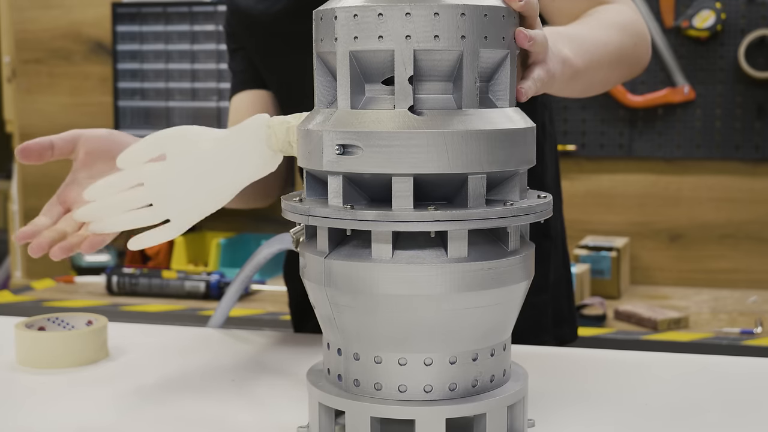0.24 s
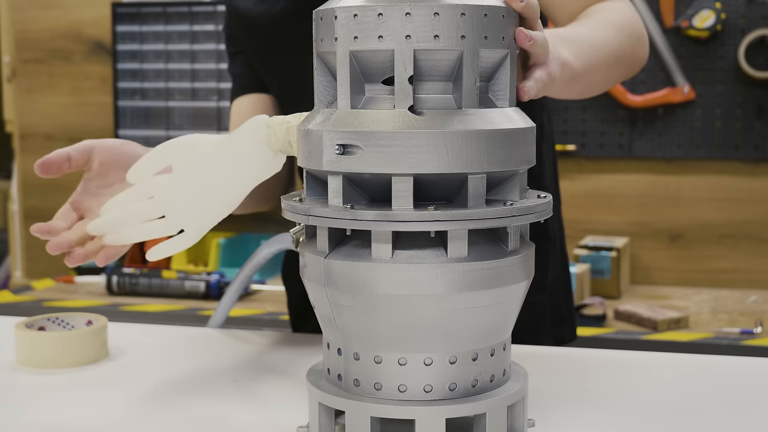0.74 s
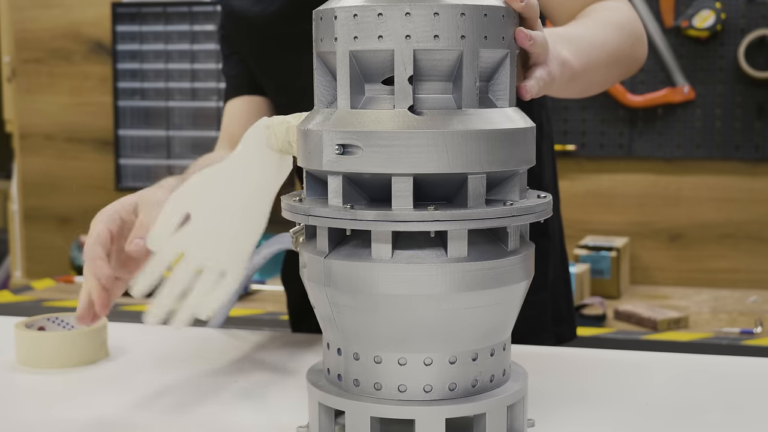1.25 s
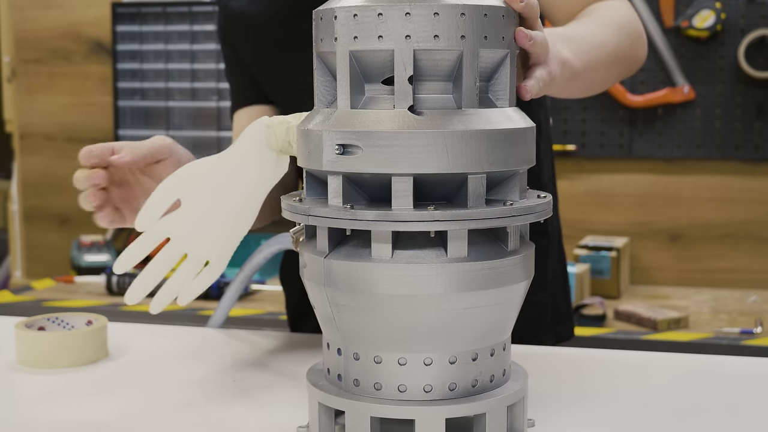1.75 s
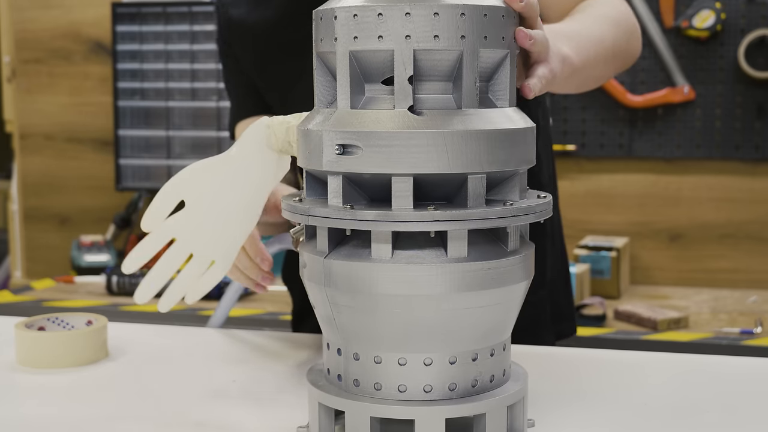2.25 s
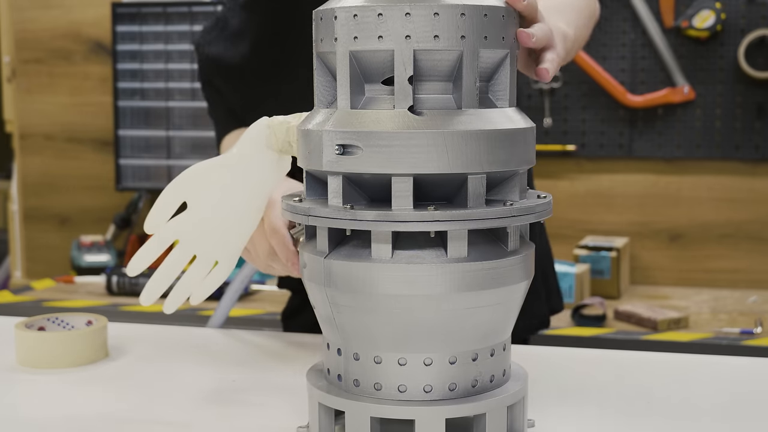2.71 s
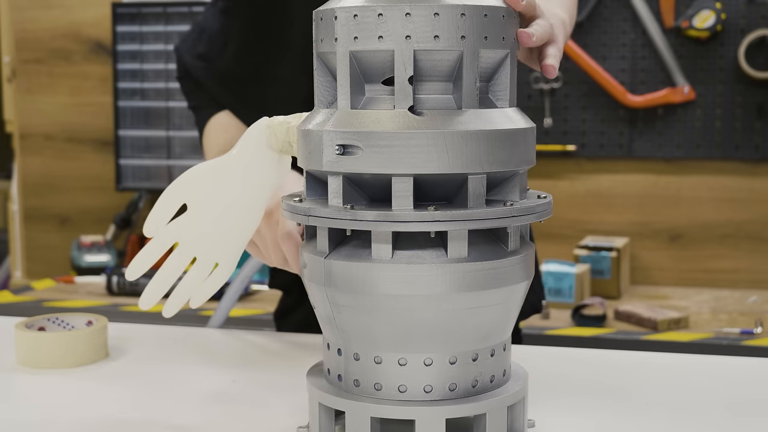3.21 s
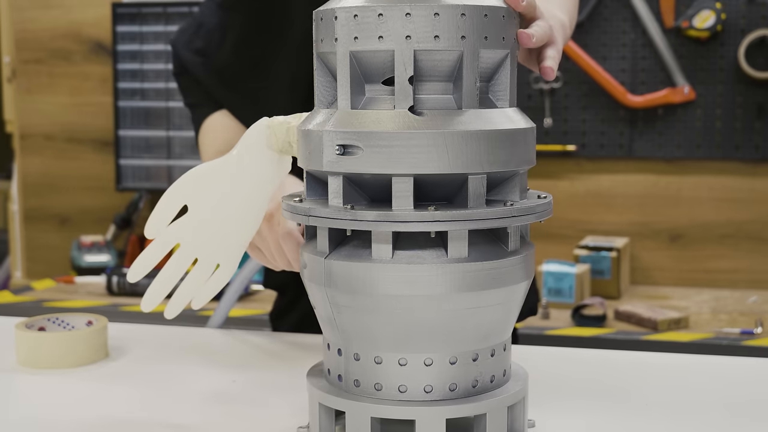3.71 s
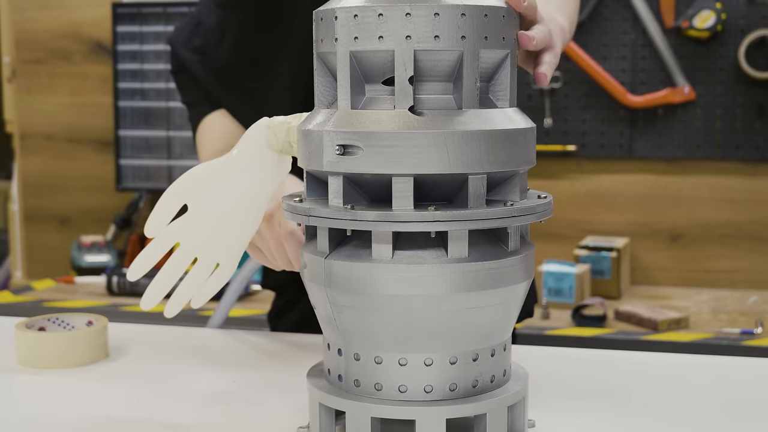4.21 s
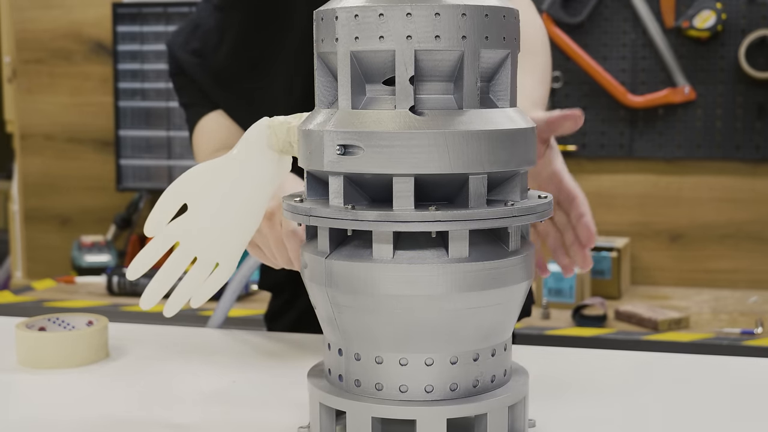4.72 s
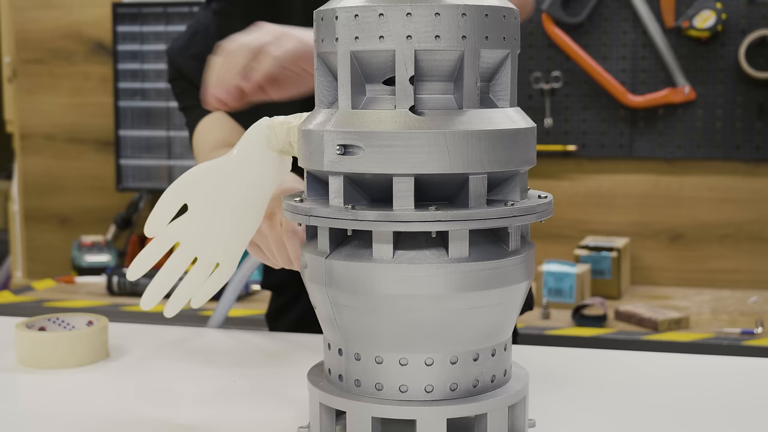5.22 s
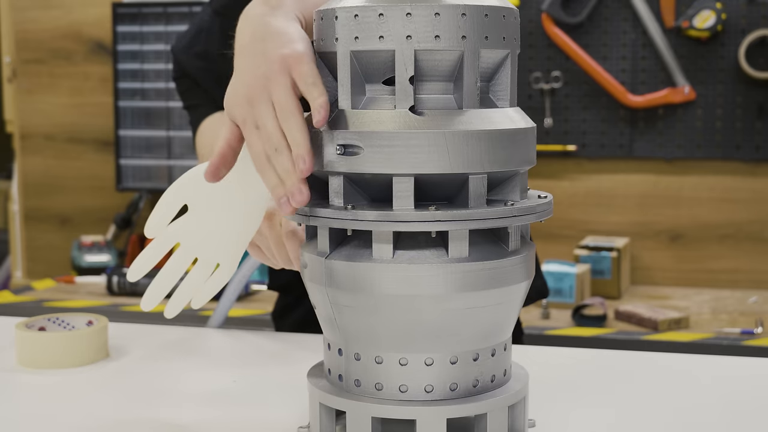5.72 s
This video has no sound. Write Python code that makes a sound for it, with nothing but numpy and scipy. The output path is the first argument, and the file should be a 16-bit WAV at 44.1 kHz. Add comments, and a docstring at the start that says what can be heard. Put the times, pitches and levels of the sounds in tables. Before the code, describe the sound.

Compressed air hisses through a small spinning turbine while a wavering whistle swells above its rush and low hum.

```python
"""On a workbench, compressed air drives a small turbine that spins the impellers of a plastic compressor.
The bench drones; the rotor hums and its blades sing faintly as it speeds up and sags. Turbulence roars
in the housing, and the exhaust jet hisses through narrow resonant ducts. The main sound is a wavering
whistle, made as the flow locks onto the resonance of one cavity in the housing.
The gain control of a close microphone ducks the rest under the whistle."""
import sys
import numpy as np
from scipy import signal
from scipy.fft import rfft, irfft
from scipy.io import wavfile
from scipy.ndimage import uniform_filter1d, minimum_filter1d

SR = 44100
rng = np.random.default_rng(int(sys.argv[2]) if len(sys.argv) > 2 else 0)


def file_out(sig):
    """Save sig as 16-bit WAV at sys.argv[1]."""
    # one column per channel
    cols = np.atleast_2d(sig).T
    # limit, then scale
    lim = np.clip(cols, -1, 1)
    pcm = np.round(lim * 32767).astype(np.int16)
    wavfile.write(sys.argv[1], SR, pcm)


N = 262615

# air supply, eased once the rotor is up to speed: t/s, flow level/dB
AIR_FLOW = [(0, 1.5), (.9, 1), (1.4, -1.5), (1.95, -1), (3.5, -1.5), (4.7, -2.5), (5.95, -3.5)]
# rotation rate of the shaft: t/s, f/Hz
SHAFT_SPEED = [(0, 48.88), (1.2, 55.92), (1.85, 57.23), (2.35, 55.8), (3.0, 50.8), (3.55, 48.97),
               (4.0, 50.35), (4.9, 51.3), (5.95, 50.05)]
# low drone of bench and workshop: f/Hz, relative spectral level/dB
DRONE_SPECTRUM = [(20, -45), (32, -26), (38, -3), (44, 0), (52, 7), (62, -17), (80, -8), (130, -37),
                  (400, -60)]
# turbulence in the housing: f/Hz, relative spectral level/dB
CHAMBER_SPECTRUM = [(60, -46), (125, -41), (200, -62), (300, -25), (370, -24), (410, -19.5), (520, -1.5),
                    (640, 1), (760, 3.5), (840, -2), (970, -7), (1080, -18), (1300, -26), (2000, -67)]
# wider roar of a strong jet: f/Hz, relative spectral level/dB
WIDE_ROAR_SPECTRUM = [(50, -13), (100, -15), (300, -6.5), (600, -3.5), (820, 5), (1020, 3), (1200, -5),
                      (1700, -29)]
# jet noise before the ducts colour it: f/Hz, relative spectral level/dB
JET_SPECTRUM = [(100, -42.5), (500, 5.5), (1200, -2.5), (2000, -2.75), (4000, 0), (7000, -3), (10000, -4),
                (15600, -5.5)]
# resonances of the exhaust ducts and vane passages: f/Hz, width/Hz, peak gain/dB
DUCT_MODES = [(1590, 440, 3.5), (2205, 190, 6.0), (2380, 300, 4.7), (2980, 630, 5.9), (3560, 230, 5.9),
              (4180, 430, 6.8), (4740, 330, 10.6), (5070, 330, 10.2), (5530, 560, 7.3), (6350, 900, 6.3),
              (7600, 330, 5.0), (8280, 480, 2.6), (9400, 520, 5.6), (10430, 610, 3.1), (11260, 900, 5.4),
              (12770, 900, 8.3), (13740, 480, 6.1), (14730, 450, 8.2), (15470, 610, 4.0)]
# course of the cavity whistle: t/s, f/Hz, level/dB
WHISTLE_COURSE = [(0, 744, -56), (.7, 741.4, -39), (1.15, 737, -22), (1.4, 739.1, -13), (1.7, 721, -12),
                  (2.1, 717, -8.5), (3.2, 713.7, -10.5), (4.3, 717.3, -12.5), (5.15, 725.4, -15),
                  (5.55, 743.6, -21.5), (5.95, 737, -22)]
# the whistle briefly loses its lock on the cavity: t/s, dip in level/dB
LOCK_LOSSES = [(1.39, 6.5), (3.9, 1.5), (4.75, 6.5), (4.93, 6), (5.58, 4)]

FULL_SPEED_HZ = 57.46


def undb(db):
    """Amplitude ratio of a level in decibels."""
    return 10 ** (np.asarray(db) / 20)


def curves(table):
    """Linear interpolation in time: each column after the first as a value per sample."""
    times, *columns = np.transpose(table)
    return [np.interp(np.arange(N) / SR, times, column) for column in columns]


def bins():
    """Frequencies of the Fourier bins, at least 1 Hz."""
    return np.maximum(np.arange(N // 2 + 1) * SR / N, 1)


def spectral_gain(spectrum):
    """Gain per bin, by interpolation of level over log frequency."""
    hz, db = np.transpose(spectrum)
    return undb(np.interp(np.log(bins()), np.log(hz), db))


def noise(gain):
    """Spectral shaping: white noise weighted by a gain per bin, then scaled to rms 1."""
    shaped = irfft(rfft(rng.standard_normal(N)) * gain, N)
    return shaped / np.sqrt(np.mean(shaped ** 2))


def waver(rate_hz):
    """Low-pass noise: a random fluctuation of rms 1, mostly slower than the given rate."""
    return noise(1 / (1 + (bins() / rate_hz) ** 4))


def reflections(share, decay_s, count=40):
    """Interference of direct sound with echoes off nearby surfaces that absorb treble, as gain per bin."""
    lag_s = rng.uniform(.002, .03, count)
    echoes = np.zeros(N)
    echoes[(lag_s * SR).astype(int)] = rng.standard_normal(count) * np.exp(-lag_s / decay_s)
    return 1 + share * rfft(echoes / np.linalg.norm(echoes)) / np.hypot(1, bins() / 7000)


def bench_drone(flow_db):
    """Forced vibration: the machine shakes the bench, harder at strong flow."""
    return undb(-43 + 2.2 * flow_db) * noise(spectral_gain(DRONE_SPECTRUM))


def rotor_tones(shaft_hz, flow_db, blade_count=8, housing_hz=146.5, housing_width_hz=10.5):
    """Periodic forcing: unbalance hums at the shaft rate, and the blades sing at their passing rate."""
    angle = 2 * np.pi * np.cumsum(shaft_hz * (1 + 0.0011 * waver(5.1))) / SR
    sag_hz = FULL_SPEED_HZ - shaft_hz
    hum = undb(-30.5 - 3 * sag_hz) * np.sin(angle)
    # the third shaft harmonic excites a housing resonance
    resonance = 1 / np.hypot(1, 2 * (3 * shaft_hz - housing_hz) / housing_width_hz)
    housing = undb(-46.5 + 3.6 * flow_db + 2.4 * waver(9)) * resonance * np.sin(3 * angle)
    speed_db = -1.05 * sag_hz
    blades = undb(-30.5 + speed_db + 1.83 * flow_db + 0.4 * waver(40)) * np.sin(blade_count * angle)
    # the octave comes and goes with the turbulence at the blade tips
    octave = undb(-32.5 + speed_db + 4.9 * flow_db + 2.7 * waver(28)) * np.sin(2 * blade_count * angle)
    return np.sqrt(2) * (hum + housing + blades + octave)


def exhaust_hiss(flow_db, split_hz=5780):
    """Jet noise filtered by duct resonances; the finest eddies fade first as the flow eases."""
    ducts_db = sum(db * np.exp(-(2 * (bins() - hz) / width) ** 2) for hz, width, db in DUCT_MODES)
    colour = spectral_gain(JET_SPECTRUM) * undb(ducts_db) * reflections(share=0.25, decay_s=0.0062)
    coarse_share = 1 / (1 + (bins() / split_hz) ** 20)
    hiss = undb(-23 + 0.79 * flow_db) * noise(colour * np.sqrt(coarse_share))
    sizzle = undb(-23.5 + 1.3 * flow_db) * noise(colour * np.sqrt(1 - coarse_share))
    return (hiss + sizzle) * undb(0.75 * waver(84))


def housing_roar(shaft_hz, flow_db):
    """Turbulence: the impellers stir the air in the housing's chambers; a strong jet widens the band."""
    chamber_db = -19.5 + .25 * (shaft_hz - FULL_SPEED_HZ) + 0.11 * flow_db
    colour = spectral_gain(CHAMBER_SPECTRUM) * reflections(share=0.14, decay_s=0.011)
    chambers = undb(chamber_db) * noise(colour)
    wide_roar = undb(-31.5 + 2.06 * flow_db) * noise(spectral_gain(WIDE_ROAR_SPECTRUM))
    return (chambers + wide_roar) * undb(0.64 * waver(22))


def cavity_whistle(dip_half_width_s=0.05, wander_hz=2.384, wander_db=1.13):
    """Flow-excited resonance: eddies shake the tone, which grows steadier and richer with strength."""
    hz, db = curves(WHISTLE_COURSE)
    t = np.arange(N) / SR
    db = db - sum(depth * np.exp(-((t - at) / dip_half_width_s) ** 2) for at, depth in LOCK_LOSSES)
    strength = np.sqrt(undb(db - db.max()))
    hz = hz + wander_hz * waver(7.9)
    db = db + wander_db * waver(7.9)
    large_eddies = 0.0061 * waver(36.4)
    small_eddies = 0.012 * waver(111.3)
    pitch_shake = (large_eddies + small_eddies) / np.maximum(strength, .33)
    phase = 2 * np.pi * np.cumsum(hz * (1 + pitch_shake)) / SR
    second = undb(-29 + 2 * waver(40)) * np.sin(2 * phase + 0.14 * waver(45.3))
    third = undb(-25.5 + 2 * waver(40)) * np.sin(3 * phase + 0.24 * waver(45))
    tone = np.sin(phase) + strength * (second + third)
    return np.sqrt(2) * undb(db + 1.2 * waver(29.77)) * tone


def scene():
    """Superposition: the sounds of bench and machine add, alike in both channels."""
    shaft_hz, = curves(SHAFT_SPEED)
    flow_db, = curves(AIR_FLOW)
    background = bench_drone(flow_db) + rotor_tones(shaft_hz, flow_db)
    mono = background + cavity_whistle() + housing_roar(shaft_hz, flow_db) + exhaust_hiss(flow_db)
    return np.array([mono, mono])


def compress(x, threshold_db, ratio, window_s):
    """Automatic gain control: the swelling whistle raises the mean power and so ducks hiss and roar."""
    power = uniform_filter1d(np.mean(x ** 2, axis=0), int(window_s * SR))
    over_db = np.maximum(10 * np.log10(power) - threshold_db, 0)
    return x * undb(-over_db * (1 - 1 / ratio))


def limit(x, ceiling_db, hold_s):
    """Look-ahead limiting: the gain falls quickly around peaks that pass the ceiling."""
    size = int(hold_s * SR)
    ceiling = undb(ceiling_db)
    gain = ceiling / np.maximum(np.abs(x).max(axis=0), ceiling)
    return x * uniform_filter1d(minimum_filter1d(gain, size), size)


def record(dry):
    """Dynamic range and band limiting: the level is evened, peaks are held and the top treble is cut."""
    even = compress(dry, threshold_db=-23.0, ratio=2.47, window_s=0.22)
    held = limit(even * undb(2.6), ceiling_db=-9.5, hold_s=0.0044)
    cutoff_hz = 15600
    return signal.sosfilt(signal.ellip(14, .2, 80, cutoff_hz, fs=SR, output="sos"), held)


dry = scene()
out = record(dry)
file_out(out)
```